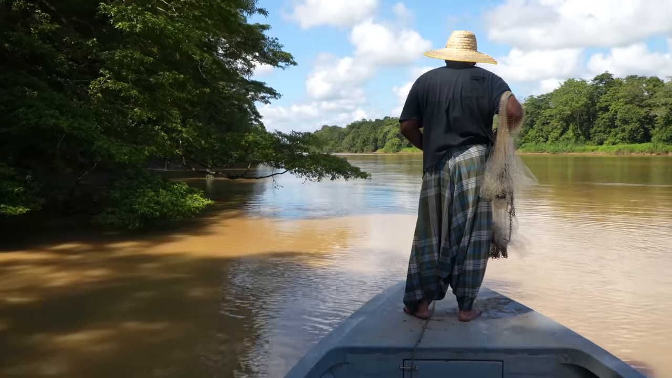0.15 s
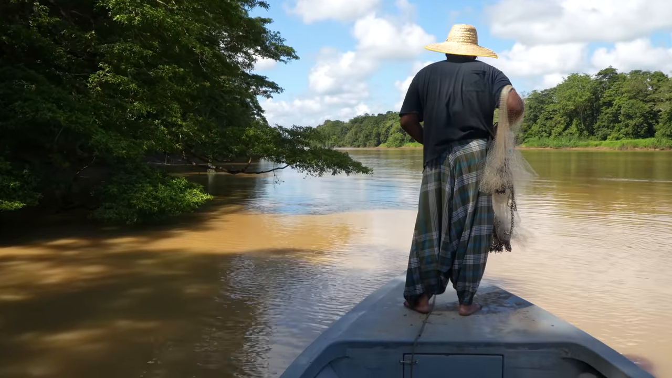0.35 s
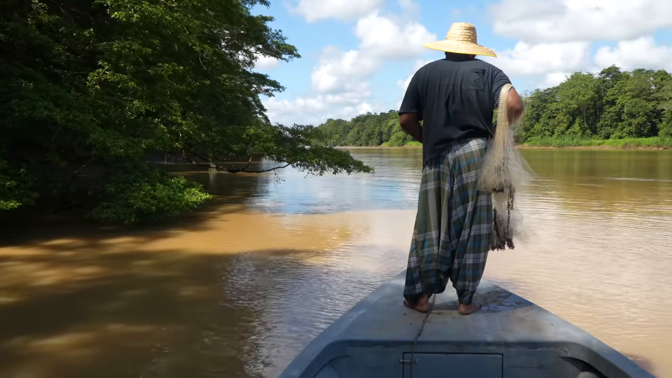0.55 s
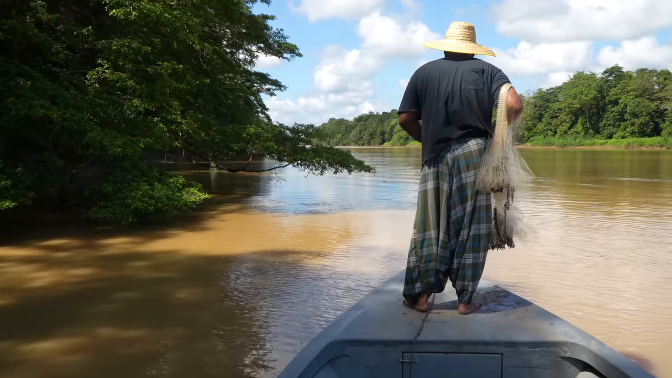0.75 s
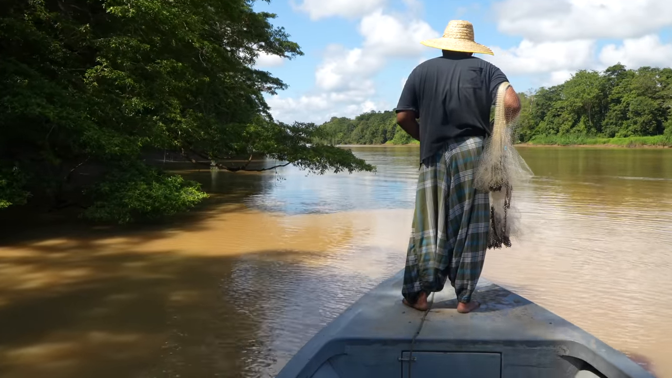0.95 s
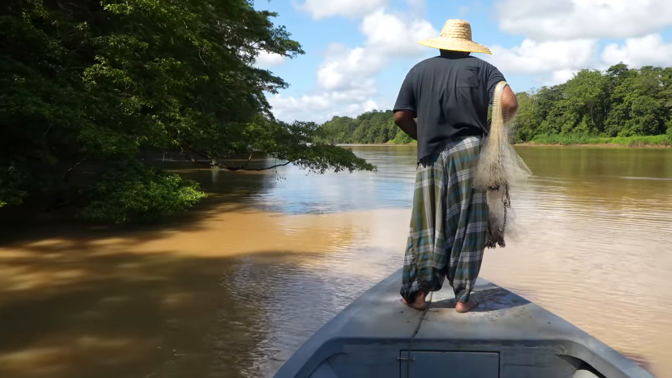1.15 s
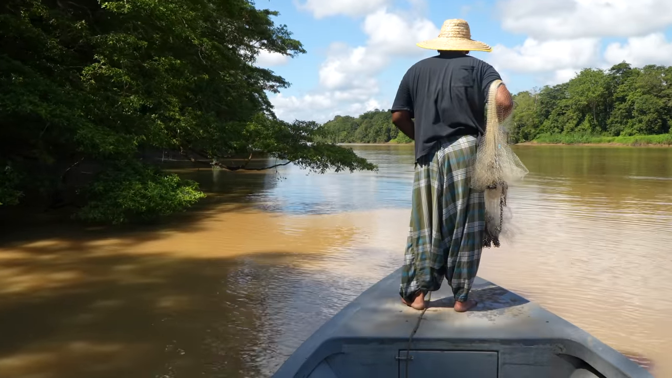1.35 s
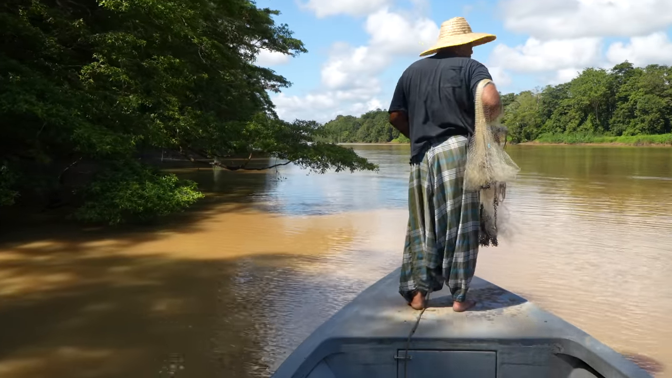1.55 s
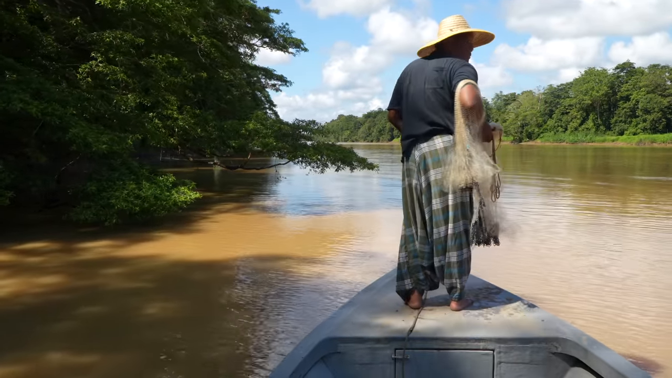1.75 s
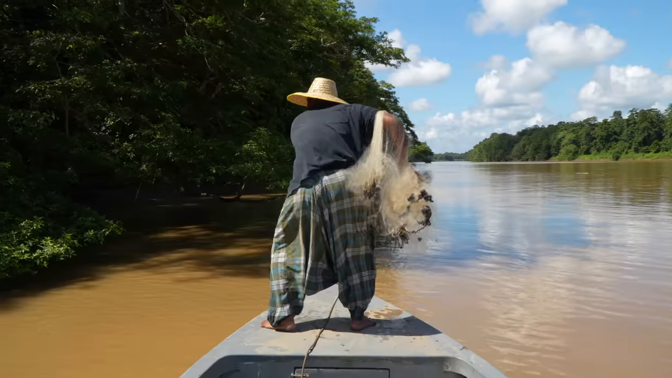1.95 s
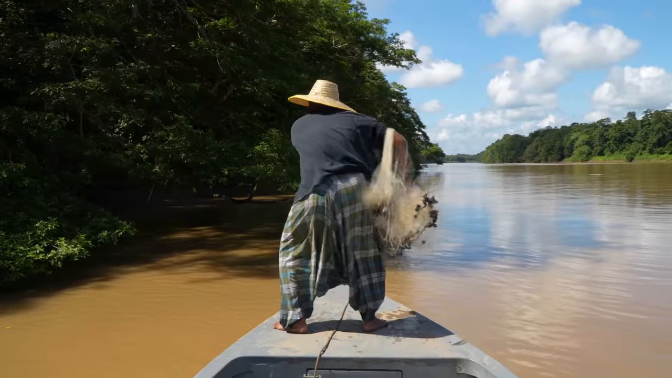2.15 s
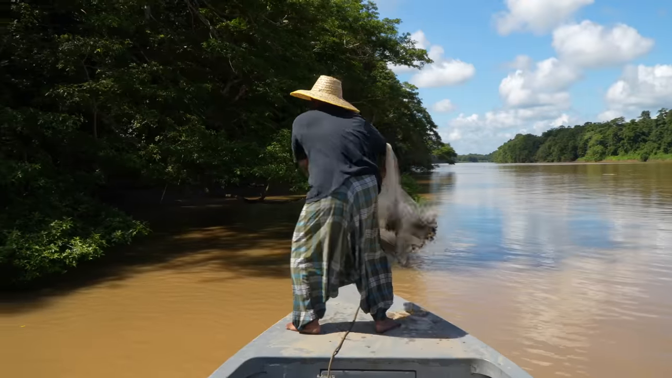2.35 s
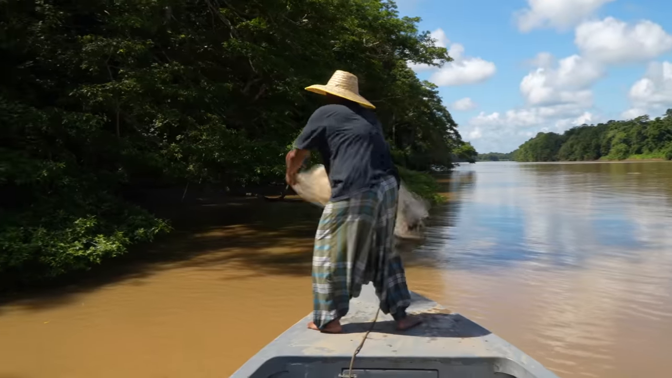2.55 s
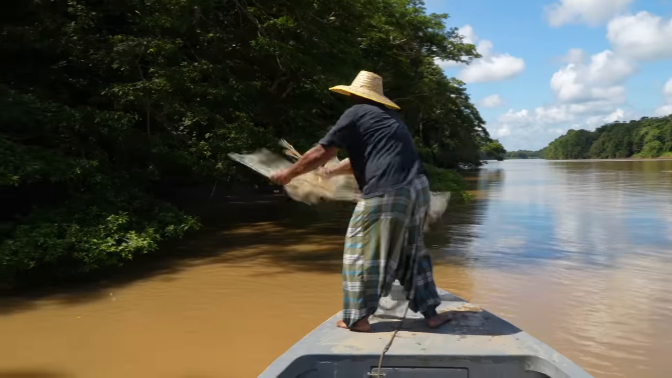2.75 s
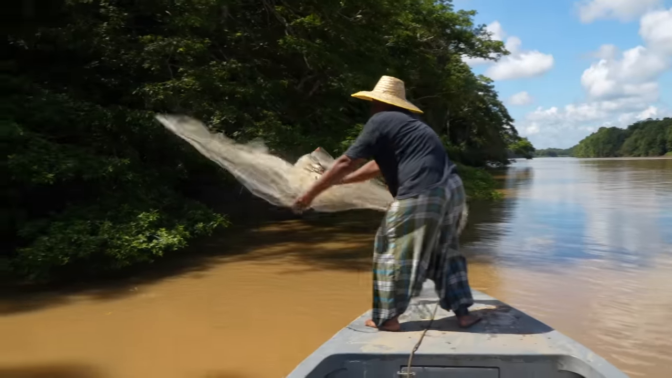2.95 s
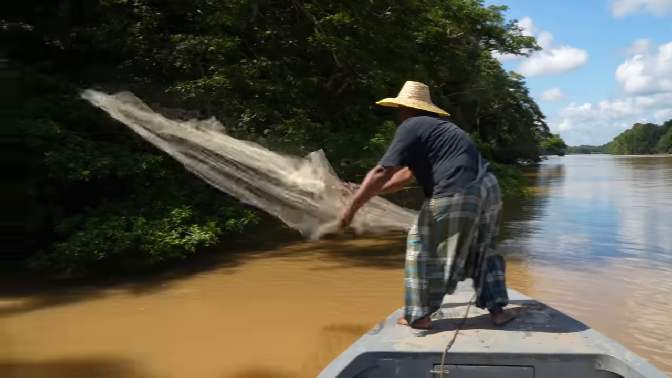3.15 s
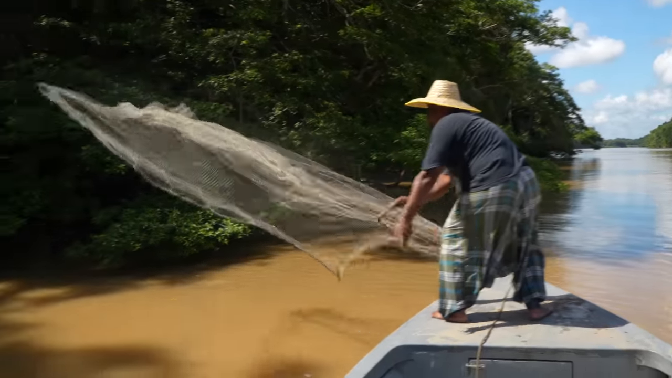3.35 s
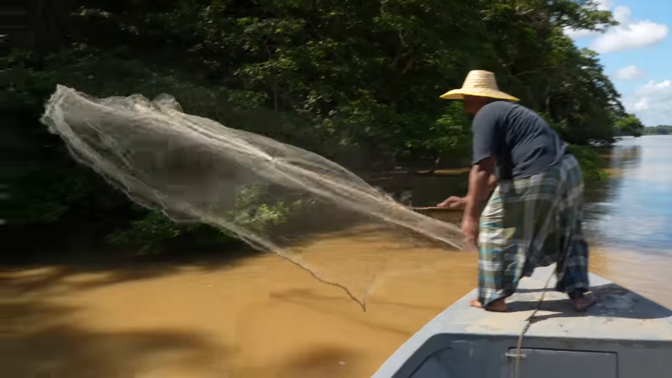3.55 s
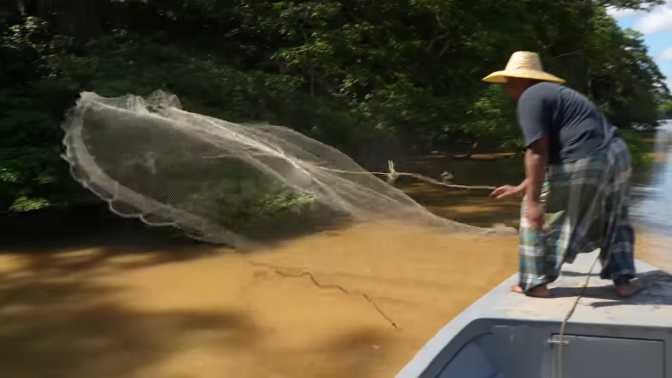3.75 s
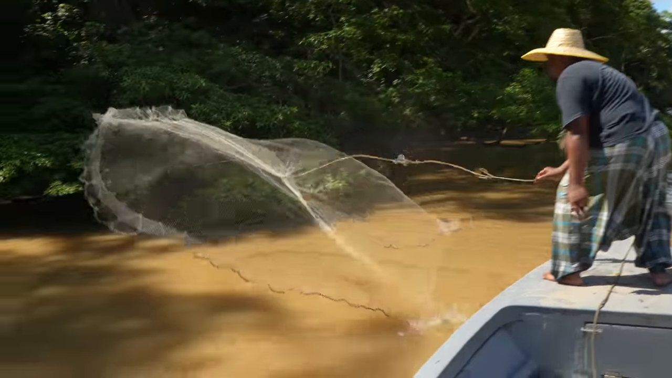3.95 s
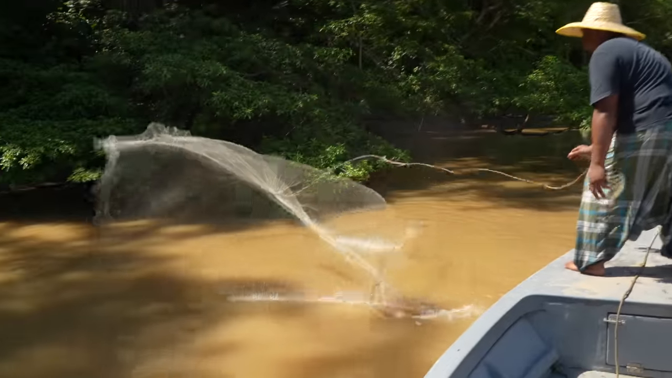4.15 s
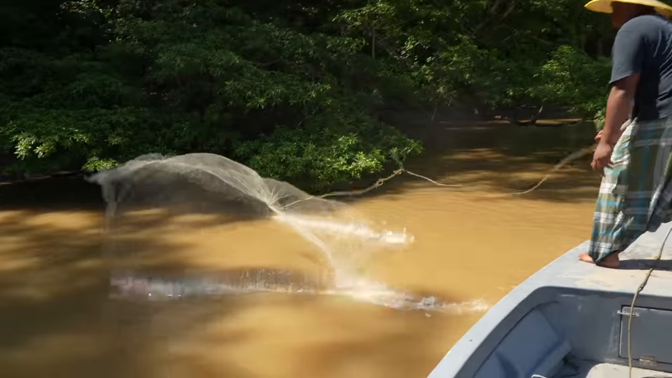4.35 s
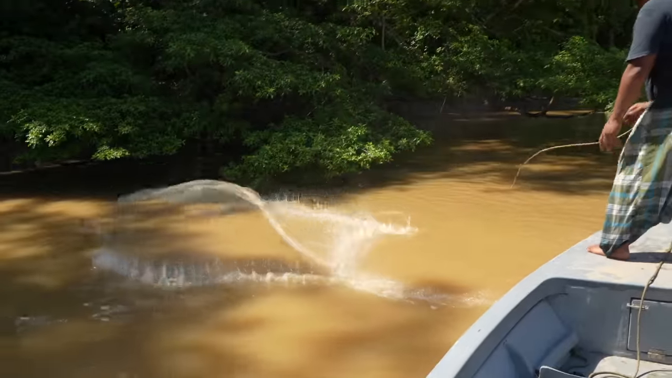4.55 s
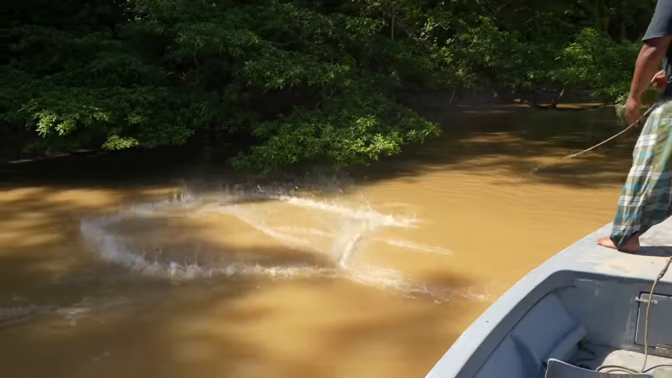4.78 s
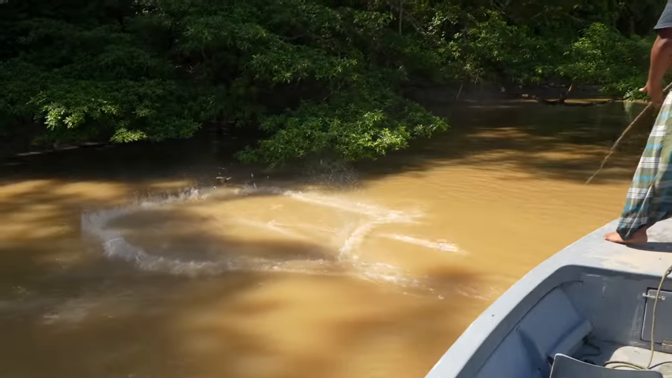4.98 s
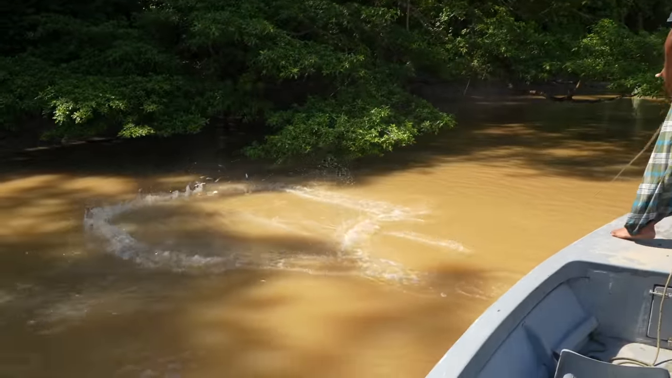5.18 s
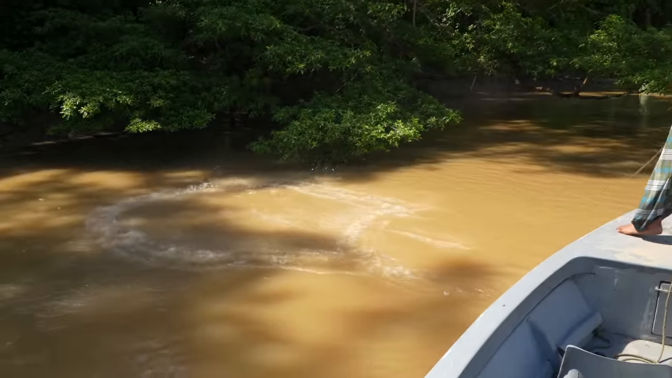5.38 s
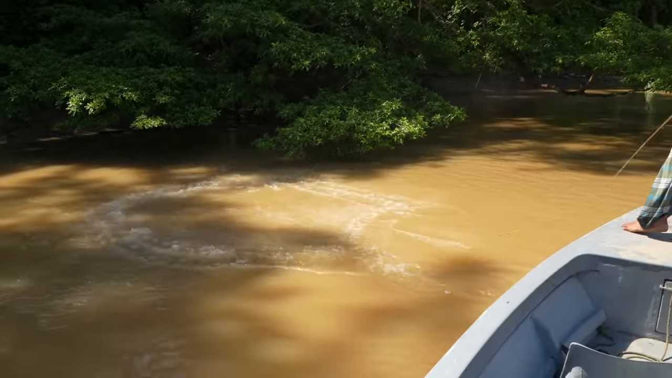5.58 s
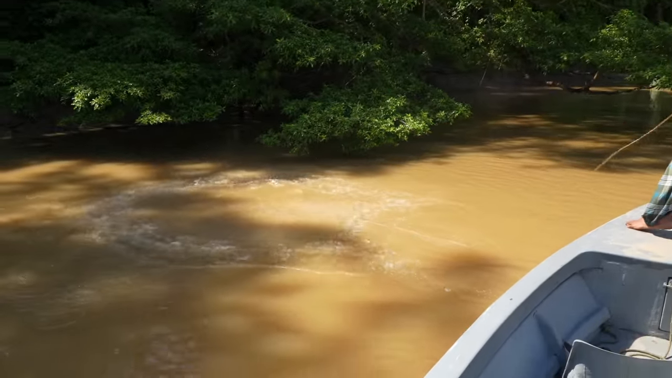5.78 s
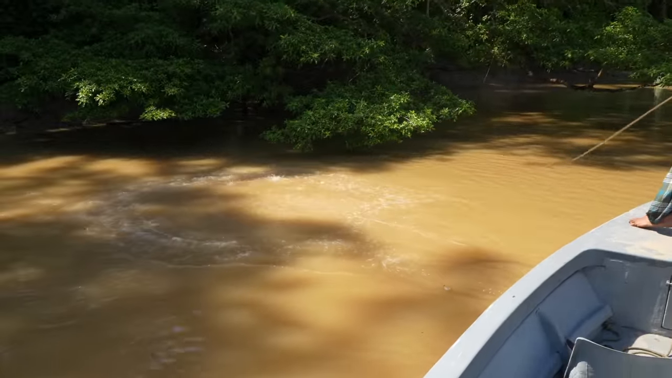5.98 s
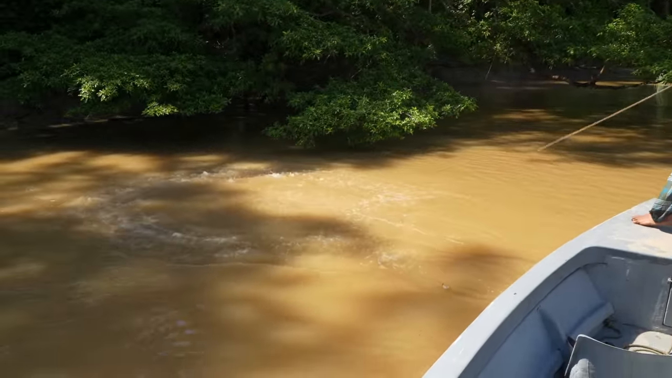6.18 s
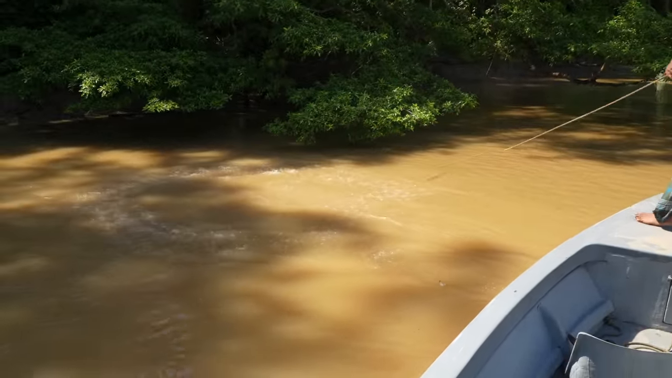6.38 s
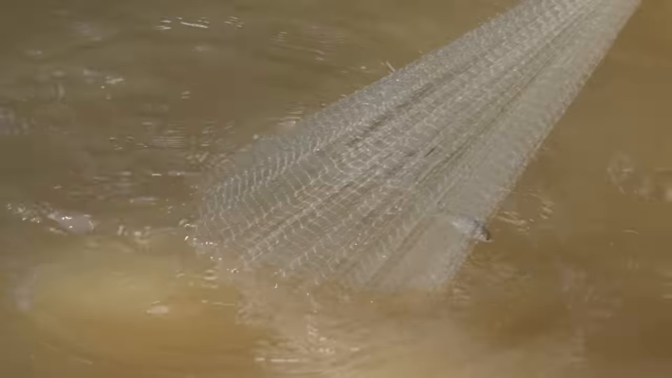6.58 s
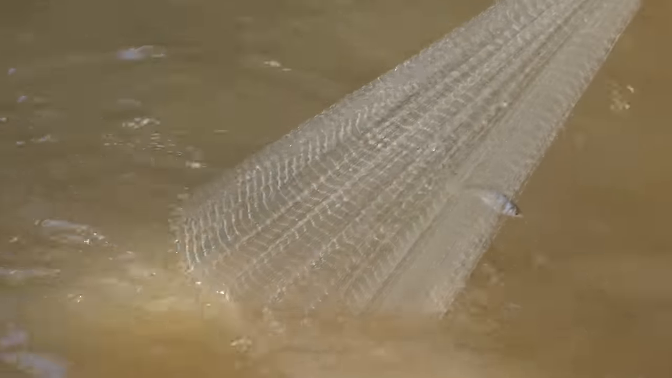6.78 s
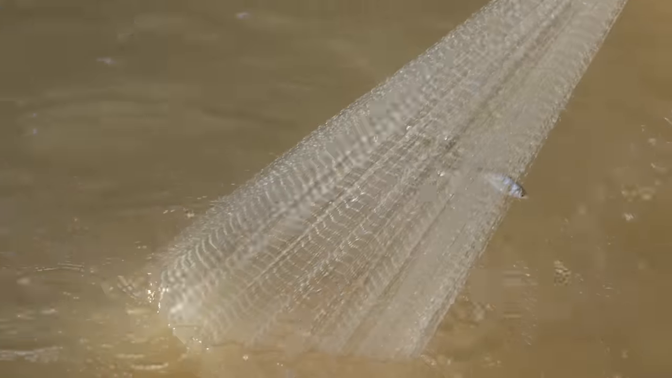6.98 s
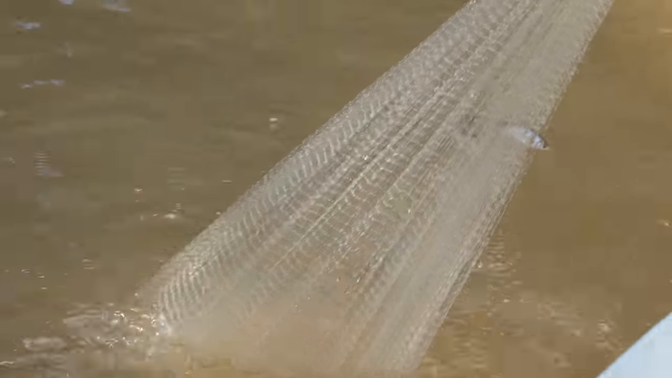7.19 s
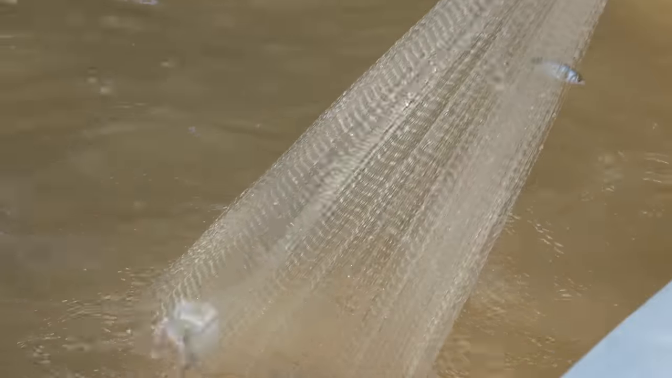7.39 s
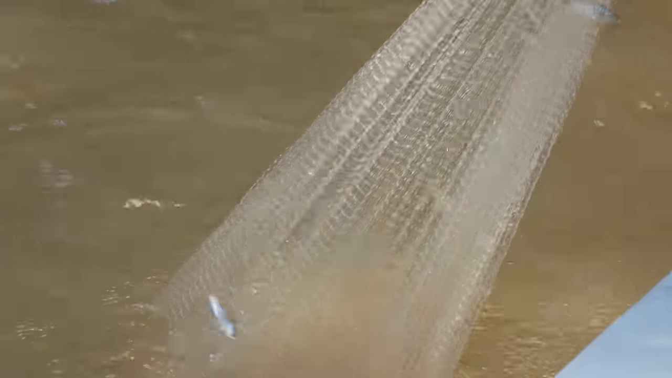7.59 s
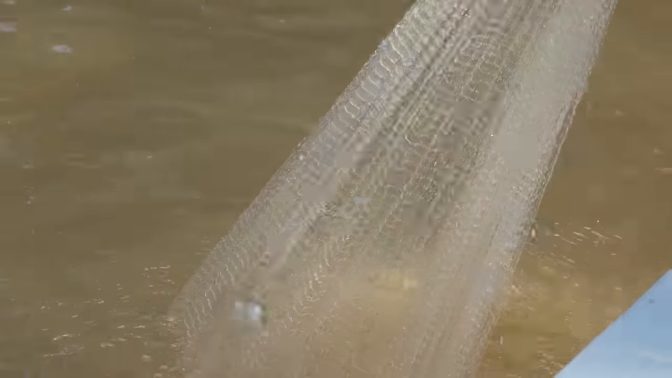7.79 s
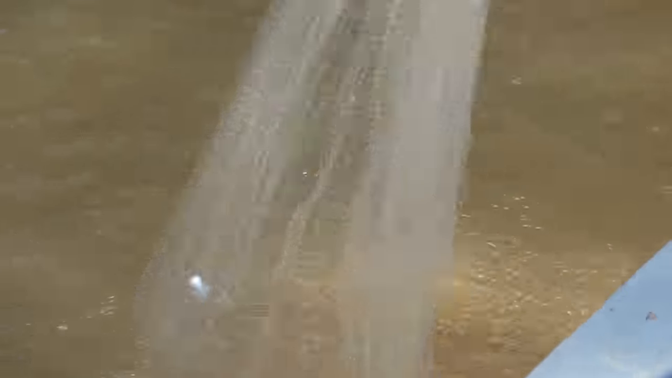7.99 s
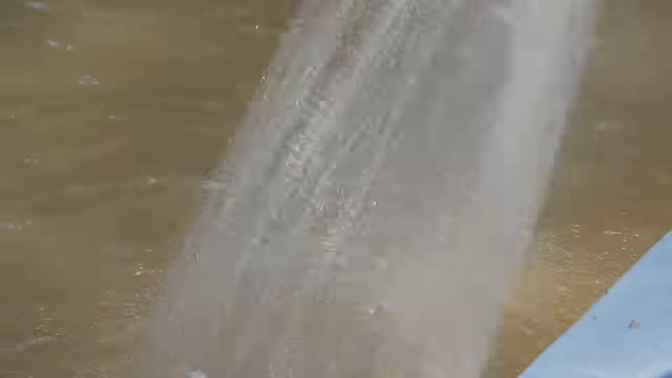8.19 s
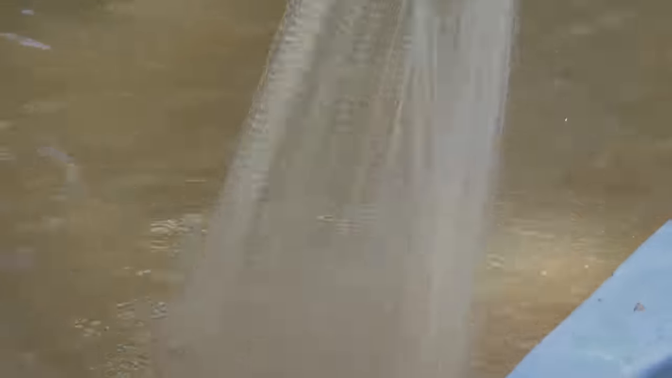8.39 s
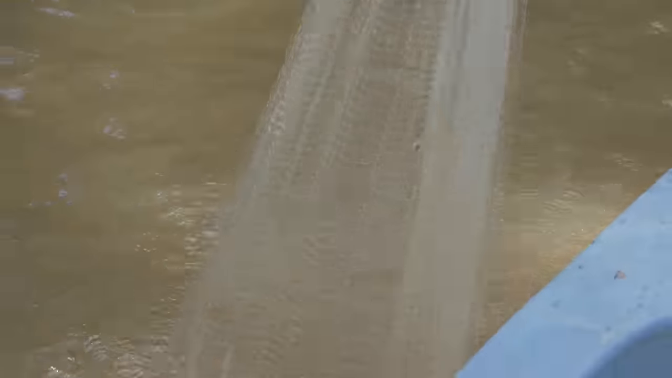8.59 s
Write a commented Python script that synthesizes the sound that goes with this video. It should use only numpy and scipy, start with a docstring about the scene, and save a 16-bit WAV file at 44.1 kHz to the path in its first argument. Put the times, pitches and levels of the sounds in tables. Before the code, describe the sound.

Insects hiss steadily as a boat motor stops, a foot thumps, a thrown net splashes down and its weights knock against the boat.

```python
"""A weighted net slaps and rains onto a forest river, cast from a small boat under a choir of insects.
First the outboard motor idles in noisy puffs and fades, a few far birds whistle and a foot thumps
the deck. After the splash come bubbles and drips, little pockets of air that ring in the water.
As the net is hauled in, its weights knock the hull and make it ring. A breeze rumbles underneath."""
import sys
import numpy as np
from scipy import signal
from scipy.fft import rfft, irfft
from scipy.io import wavfile
from scipy.ndimage import uniform_filter1d

SR = 44100
rng = np.random.default_rng(int(sys.argv[2]) if len(sys.argv) > 2 else 0)


def to_wav(s):
    """Save 16-bit WAV."""
    ch = np.atleast_2d(s).T  # columns
    pcm = np.round(np.clip(ch, -1, 1) * 32767)  # PCM
    wavfile.write(sys.argv[1], SR, pcm.astype(np.int16))


N = 380583
T = np.arange(N) / SR

# A colour says how strong each pitch is next to the others. t60 is the time to fade by 60 dB.
# colour of the insect choir: f/Hz, level/dB
INSECT_COLOUR = [(3240, -67), (5500, -37), (5960, -34), (6750, -8.5), (7130, -0.5), (7490, 3), (8260, -3.5),
                 (8910, -23.5), (10200, -34.5), (12300, -64), (12900, -38), (13300, -27), (14600, -17.5),
                 (15500, -19.5), (16000, -34)]
# colour of leaves and far water: f/Hz, level/dB
HUSH_COLOUR = [(15, -24), (25, 10.5), (81, -26), (104, -14), (204, -3.5), (392, -8), (538, -5.5),
               (1900, -38.5), (2990, -17), (3500, -11.5), (5500, -29), (7150, -88), (12100, -120)]
# breeze on the microphone: t/s, level/dB
BREEZE_LEVELS = [(0.0, -49), (0.8, -53.5), (1.55, -52), (1.87, -75), (2.5, -70), (2.95, -50.5), (3.3, -53),
                 (3.56, -58), (3.9, -55.5), (4.16, -66), (4.33, -56), (4.73, -60), (5.5, -61),
                 (6.39, -66.5), (6.7, -58), (7.59, -54), (8.07, -61), (8.63, -53.5)]
# colour of the breeze: f/Hz, level/dB
BREEZE_COLOUR = [(20, -2.5), (60, 3), (110, 0.5), (200, -10.5), (600, -39)]
# idling motor: t/s, level/dB
MOTOR_LEVELS = [(0.0, -37), (1.2, -36.5), (1.77, -44), (1.86, -64), (2.0, -82)]
# colour that exhaust and hull give the motor: f/Hz, level/dB
EXHAUST_COLOUR = [(15, -67), (25, -53), (97, -8.5), (150, -1.5), (242, 1), (366, -15.5), (410, -12.5),
                  (649, -17.5), (779, -15), (958, -16.5), (2950, -34), (3710, -31.5), (6000, -55),
                  (7800, -70), (13200, -120)]
# faint motor whines: f/Hz, width/Hz, level next to the puffs/dB
MOTOR_WHINES = [(429, 6, -15), (571.4, 27, -18.5), (788, 4.3, -18.5)]
# flow of water and wet mesh, in relative levels: t/s, churn/dB, large bubbles/dB, spray/dB
WATER_FLOW = [(1.9, -69.5, -81, -76), (2.8, -69.5, -76.5, -86.5), (3.45, -68, -62, -73),
              (3.76, -61.5, -73, -64), (3.87, -52, -57, -54), (4.1, -56.5, -67, -51),
              (4.15, -54.5, -58, -54), (4.23, -35, -40, -43), (4.38, -40.5, -51, -55),
              (4.49, -39.5, -45.5, -48.5), (4.531, -28, -61, -37.5), (4.61, -25, -26.5, -38.5),
              (4.73, -24.5, -26.5, -37), (4.78, -29.5, -28, -42), (4.92, -31.5, -39.5, -47),
              (5.24, -33, -37.5, -48), (5.4, -41.5, -46, -55.5), (5.6, -48.5, -50, -57.5),
              (5.79, -61.5, -75, -63), (6.75, -57.5, -77.5, -67.5), (7.33, -47.5, -57, -59),
              (7.7, -65.5, -67, -68.5), (8.63, -60, -54, -69)]
# gushes and dribbles on top: crest t/s, churn/dB, large bubbles/dB, spray/dB, fall time/s
WATER_GUSHES = [(2.96, -57.5, -57, -80, .06), (3.13, -58, -51, -83, .1), (3.223, -57.5, -42, -76, 0.034),
                (3.63, -58.5, -59, -64, 0.056), (3.788, -70, -34.5, -62, 0.013),
                (4.308, -50, -18, -52, 0.014), (4.402, -44, -54, -41, .01), (4.44, -49, -55, -59, .04),
                (4.834, -23.5, -27, -35.5, 0.033), (4.89, -28.5, -22, -48, 0.029),
                (5.209, -33.5, -38.5, -52, 0.083), (5.515, -51, -35, -60, 0.044),
                (5.825, -49, -79, -64, .08), (6.142, -47.5, -62, -57.5, 0.1),
                (6.265, -47.5, -75, -61, 0.073), (6.39, -81, -65, -76, 0.037),
                (6.637, -41, -88, -55.5, 0.037), (6.826, -43, -84, -66, 0.017),
                (6.913, -39, -72, -71, 0.03), (6.99, -52.5, -50, -70, 0.094), (7.2, -47, -69, -74, 0.039),
                (7.479, -51, -71, -66, 0.18), (8.212, -47.5, -69, -54, 0.054),
                (8.383, -56.5, -71, -56.5, 0.12), (8.455, -66, -49, -73, 0.036)]
# separate drops against smooth hiss: t/s, share of drops/0-1
DROP_SHARE = [(1.9, 0.3), (3.0, 0.36), (4.1, 0.2), (4.6, 0.44), (4.9, 0.49), (5.4, 0.67), (5.8, 0.6),
              (7.6, 0.93), (7.8, 0.15), (8.3, 0.27), (8.63, 0.46)]
# colour of churning water: f/Hz, level/dB
CHURN_COLOUR = [(71, -59), (120, -49), (272, -10), (316, -8.5), (442, -3), (617, -0.5), (833, 0), (1050, 1),
                (2160, -4.5), (3330, 3.5), (3680, -41), (4140, -16.5), (6500, -19), (8450, -49),
                (14300, -120)]
# colour of spray: f/Hz, level/dB
SPRAY_COLOUR = [(2240, -26.5), (3800, -8), (4290, -22), (6690, -14), (10300, -21.5), (12800, -21),
                (15100, -22.5), (16000, -34)]
# single large bubbles: t/s, length/s, first f/Hz, last f/Hz, level/dB, level change/dB
LARGE_BUBBLES = [(0.578, 0.069, 750, 760, -36, -28), (2.098, 0.032, 900, 3600, -60.5, 0),
                 (2.227, 0.054, 715, 655, -44.5, -28), (2.281, 0.007, 1820, 3700, -50, 1),
                 (2.986, 0.026, 1064, 1820, -49.5, 0.5), (3.278, 0.038, 783, 1610, -52, -5),
                 (5.285, 0.074, 299, 930, -54.5, 12), (5.51, 0.062, 284, 497, -38, -8),
                 (6.079, 0.014, 455, 455, -51, 0), (6.092, 0.037, 1015, 1150, -43.5, -11),
                 (6.317, 0.05, 360, 620, -58, 6), (6.362, 0.079, 1093, 1085, -57.5, -7),
                 (6.539, 0.039, 632, 730, -47, -16), (6.911, .052, 263, 1630, -53.5, 5),
                 (6.914, .045, 850, 902, -53, -1), (6.999, 0.078, 293, 1300, -37, -5),
                 (7.069, .02, 1396, 1600, -42, -2.5), (7.109, 0.021, 767, 2100, -26, -31),
                 (7.142, 0.03, 485, 756, -53, -13), (7.906, .06, 977, 950, -64, 7),
                 (8.113, 0.047, 550, 800, -50.5, -14), (8.426, 0.088, 587, 960, -51.5, -6),
                 (8.489, 0.027, 280, 300, -47, -13), (8.602, 0.029, 280, 280, -48, -13)]
# single drips: t/s, level/dB, f/Hz, tick above that level/dB
WATER_DRIPS = [(1.555, -41, 3000, 10), (1.904, -45.5, 616, -8), (1.951, -44, 650, -10),
               (2.109, -42.5, 2230, -5), (2.125, -44, 2970, -3), (2.206, -38.5, 2320, -3),
               (2.279, -45, 850, 6), (3.187, -42, 2600, 3), (3.232, -38.5, 890, -1), (3.272, -39, 765, -7),
               (4.399, -37, 3600, -4), (5.337, -21, 3180, -12), (5.344, -20, 3050, -20),
               (5.396, -26, 3400, 4), (5.421, -22.5, 2820, -2), (5.473, -23.5, 3630, 2),
               (5.544, -25, 830, -1), (5.637, -38, 750, -7), (5.67, -36, 3480, -5), (5.74, -34, 1420, -6),
               (5.813, -30, 2000, -2), (5.822, -29.5, 3150, -12), (5.851, -36, 1410, -7),
               (5.862, -28, 3030, -9), (5.944, -37, 2310, -6), (6.039, -39, 1360, -4),
               (6.053, -34, 3020, 0), (6.082, -42, 1010, 9), (6.119, -30, 748, -2), (6.143, -25, 3500, -8),
               (6.255, -26, 1600, 2), (6.303, -34, 820, -10), (6.342, -40, 1480, 7),
               (6.404, -28.5, 2200, -3), (6.44, -35.5, 694, -13), (6.473, -38, 2970, -1),
               (6.613, -30.5, 2620, -5), (6.62, -30.5, 1250, -5), (6.642, -26.5, 2420, 4),
               (6.824, -30.5, 2770, -5), (6.895, -33.5, 496, 1), (6.916, -32.5, 1510, 0),
               (6.952, -29, 1950, -10), (6.998, -38, 520, -3), (7.132, -24, 1730, -8),
               (7.157, -30, 3380, -13), (7.192, -32, 3420, -5), (7.205, -34, 790, -3),
               (7.237, -38, 3260, -5), (7.269, -33, 1310, -1), (7.366, -24, 940, -2),
               (7.461, -29.5, 1520, -1), (7.704, -34.5, 1060, -4), (7.958, -43.5, 820, -12),
               (8.182, -38, 3120, -5), (8.206, -30.5, 2860, -7), (8.211, -30, 3320, 2),
               (8.225, -34, 1040, -4), (8.24, -31, 990, 7.5), (8.319, -40.5, 690, 6),
               (8.413, -41, 1170, -5), (8.43, -28.5, 2610, -12)]
# colour of the tick that starts a drip or a crack: f/Hz, level/dB
TICK_COLOUR = [(200, -35), (1200, 2.5), (3400, 5), (4300, -12), (7000, -8.5), (14000, -31)]
# far birds: t/s, length/s, f/Hz, level/dB
BIRD_NOTES = [(1.745, 0.22, 3100, -78), (2.222, .05, 3540, -59), (2.32, .04, 4500, -68),
              (2.356, 0.07, 3590, -59), (2.358, 0.033, 2880, -64), (2.455, .05, 3400, -64),
              (2.772, 0.035, 3560, -67), (2.862, 0.031, 3550, -57)]
# foot on the deck: t/s, level/dB, first f/Hz, settled f/Hz, t60/s
FOOT_THUMPS = [(2.881, -2.3, 70, 46, .22)]
# booms after the feet, the slap and the weights: t/s, level/dB, centre f/Hz, rise/s, t60/s
DULL_BOOMS = [(2.887, -18, 143, .006, 0.076), (2.961, -38.5, 59.5, 0.011, 0.5),
              (3.209, -35, 78, 0.014, 0.26), (4.19, -22, 88, 0.034, 0.4), (7.51, -36, 200, .008, .2),
              (7.588, -30.5, 233, .008, 0.32)]
# cracks of the deck under the foot: t/s, level/dB
DECK_CRACKS = [(2.889, -21), (2.914, -27)]
# the net's weighted edge hits the water: t/s, level/dB
NET_SLAPS = [(4.166, -6), (4.177, -2), (4.19, -0.5), (4.22, -16.5), (4.261, -15), (4.305, -24)]
# colour of a slap: f/Hz, level/dB
SLAP_COLOUR = [(24, -66), (40, -30), (269, -1.5), (402, -7), (715, 8.5), (852, -3), (1270, 5), (1850, -8.5),
               (2840, -6.5), (3380, 5), (4340, -10.5), (9690, -13), (16000, -26)]
# how long each pitch lasts in a slap: f/Hz, t60/s
SLAP_FADE = [(60, 0.67), (250, 0.42), (800, 0.15), (3300, 0.14), (6000, 0.058), (14000, 0.068)]
# weights on the hull: t/s, level/dB, hardness/dB per octave, rattle/dB, rise/s,
# ring time/factor, pitch/factor, roughness/0-1
WEIGHT_KNOCKS = [(7.288, -3.5, 3, 2, 0.015, 1, 1.005, 0.06),
                 (7.512, -19.5, -0.5, -24, 0.0018, 0.46, 0.89, 0.78),
                 (7.589, -20.5, 1, -2.5, 0.0013, 0.62, 1.23, 1)]
# the hull's own ringing tones: f/Hz, level/dB, t60/s
HULL_TONES = [(151, -33, 0.22), (208, 2.9, 0.26), (275.5, -9, 0.25), (474, -12.5, 0.29), (612, -16.5, 0.21),
              (703, -17, 0.22), (810, -4, 0.17), (968, -5.5, 0.13), (1180, -1, 0.055), (1253, -17, 0.1),
              (1330, -14, 0.12), (1620, -17, 0.081), (1980, -42, 0.09)]
# colour of the rattling weights: f/Hz, level/dB
RATTLE_COLOUR = [(60, -50), (200, -2), (900, 7), (3400, -0.5), (5000, -8), (12000, -36)]


def amp(db):
    """Turns decibels into a factor to multiply by."""
    return 10 ** (np.asarray(db) / 20)


def evened(x):
    """Scales a signal to an average power of 1."""
    return x / np.sqrt(np.mean(x ** 2) + 1e-20)


def over_time(points):
    """Joins (time, value) points with straight lines."""
    return np.interp(T, *np.transpose(points))


def at_pitch(points, hz):
    """Looks up a value between (pitch, value) points, with octaves evenly spaced."""
    f, value = np.transpose(points)
    return np.interp(np.log(hz + 1), np.log(f + 1), value)


def add(mix, s, sound):
    """Mixes a sound in at s seconds."""
    part = mix[round(s * SR):][:len(sound)]
    part += sound[:len(part)]


def colour(x, points):
    """Gives a sound a colour and a power of 1. Nothing rings early, so clicks keep a sharp front."""
    hz = abs(np.fft.fftfreq(8192, 1 / SR))
    log_gain = np.log(amp(np.maximum(at_pitch(points, hz), -100)))
    phase = -signal.hilbert(log_gain).imag
    response = np.fft.ifft(np.exp(log_gain + 1j * phase)).real[:4096]
    return evened(signal.oaconvolve(x, response)[:len(x)])


def whistle(hz, width_hz):
    """Noise squeezed around one pitch: a fuzzy whistle."""
    memory = np.exp(-np.pi * width_hz / SR)
    slow = signal.lfilter([1], [1, -memory], rng.standard_normal(N) + 1j * rng.standard_normal(N))
    return evened((slow * np.exp(2j * np.pi * hz * T)).real)


def wander(per_s):
    """A random wobble; a larger per_s makes it quicker."""
    steps = rng.standard_normal(int(T[-1] * 400) + 9)
    smooth = signal.lfilter([1], [1, -np.exp(-per_s / 400)], steps)
    return evened(np.interp(T * 400, np.arange(len(steps)), smooth))


def patter(per_s, spread_db, share):
    """Random drops, most small and a few large, blended with smooth hiss."""
    draw = rng.random(N) * SR / per_s
    hit, clicks = draw < 1, np.zeros(N)
    clicks[hit] = amp(spread_db * np.minimum(-np.log(draw[hit] + 1e-9), 4))
    clicks /= np.sqrt(per_s / SR) * amp(1.6 * spread_db)  # about as strong as the hiss
    return np.sqrt(share) * clicks + np.sqrt(1 - share) * rng.standard_normal(N)


def forest(insect_db=-46.5, hush_db=-64):
    """Many insects merge into a high, slightly trembling hiss, over the hush of leaves and far water."""
    insects = amp(insect_db + 0.57 * wander(per_s=270)) * colour(rng.standard_normal(N), INSECT_COLOUR)
    return insects + amp(hush_db) * colour(rng.standard_normal(N), HUSH_COLOUR)


def breeze():
    """Air blowing on the microphone makes a lumpy, low rumble."""
    rumble = colour(rng.standard_normal(N), BREEZE_COLOUR)
    return amp(over_time(BREEZE_LEVELS) + 2 * wander(per_s=10)) * rumble


def motor(firings_per_s=28):
    """Each uneven firing sends a puff of noise through the exhaust."""
    firings = np.cumsum(firings_per_s * (1 + 0.16 * wander(per_s=57))) / SR
    strength = amp(3 * rng.standard_normal(400)[firings.astype(int) % 400])
    puffs = (1.7 + strength * np.exp(-(firings % 1) / 0.85)) * rng.standard_normal(N)
    whines = sum(amp(db) * whistle(hz, width) for hz, width, db in MOTOR_WHINES)
    level_db = np.interp(T, *np.transpose(MOTOR_LEVELS), right=-120)
    return amp(level_db) * (colour(puffs, EXHAUST_COLOUR) + whines)


def water_levels(rise_share=0.82):
    """Adds the power of flow and gushes, giving churn, large-bubble and spray levels in dB."""
    s, *columns = np.transpose(WATER_FLOW)
    power = np.array([amp(np.interp(T, s, column)) ** 2 for column in columns])
    for crest, churn_db, deep_db, spray_db, fall in WATER_GUSHES:
        near = slice(round((crest - .25) * SR), round((crest + .5) * SR))
        away = (T[near] - crest) / fall
        shape_db = -10 * np.where(away > 0, away, -away / rise_share)  # rises faster than it falls
        power[:, near] += amp(np.array([[churn_db], [deep_db], [spray_db]]) + shape_db) ** 2
    return 10 * np.log10(power)


def water():
    """A swarm of rising bubbles under fizzing spray; the large, low ones come and go by themselves."""
    churn_db, deep_db, spray_db = water_levels()
    drops = over_time(DROP_SHARE)
    busy = np.clip(amp(.7 * (churn_db + 28.5)), .1, 1)  # calm water has few bubbles
    swarm = np.zeros(N)
    for hz in np.geomspace(150, 5500, num=26):
        cycles = hz * T[:int(14 * SR / hz)]
        envelope = np.exp(-cycles / 1.88) * (1 - np.exp(-cycles / 5.5))
        blip = envelope * np.sin(2 * np.pi * cycles * (1 + 0.018 * cycles))
        large = np.clip(np.log2(1300 / hz) / 2.2, 0, 1)  # 1 for large bubbles, 0 for small
        level_db = churn_db + large * (deep_db + 7 - churn_db)
        kicks = amp(level_db) * patter(busy * hz / 12, spread_db=2.5, share=drops)
        bubbling = signal.oaconvolve(kicks, blip / np.linalg.norm(blip))[:N]
        swarm += amp(at_pitch(CHURN_COLOUR, hz)) * np.sqrt(hz / 1000) * bubbling
    swarm = signal.sosfilt(signal.butter(4, 170, "high", fs=SR, output="sos"), swarm)  # no deep bass
    clumps = amp((1.67 - 0.6 * busy) * wander(per_s=410))  # drops land in clumps
    fizz = colour(patter(busy * 1000, spread_db=4.3, share=drops / 2), SPRAY_COLOUR)
    return clumps * (amp(-9.5) * swarm + amp(spray_db + 5) * fizz)


def bubbles(onset_s=0.00095):
    """Each large bubble sings one tone; most climb in pitch as they near the surface."""
    out = np.zeros(N)
    for s, length, first_hz, last_hz, level_db, change_db in LARGE_BUBBLES:
        done = np.linspace(0, 1, int(length * SR))
        hz = first_hz * (last_hz / first_hz) ** (done ** 2.7)  # most of the glide comes late
        fades = np.minimum(done * length / onset_s, 1) * np.minimum(10 - 10 * done, 1)
        tone = np.sqrt(2) * np.sin(2 * np.pi * np.cumsum(hz) / SR)
        add(out, s, amp(level_db + change_db * done) * fades * tone)
    return out


def taps(rows):
    """Each small impact makes a tick, then a short ring that rises by a random amount."""
    out, t = np.zeros(N), T[:3000]
    impacts = rng.standard_normal((len(rows), len(t))) * np.exp(-t / .001)
    ticks = colour(impacts.ravel(), TICK_COLOUR).reshape(impacts.shape)
    for (s, level_db, hz, t60, tick_db), tick, rise in zip(rows, ticks, rng.random(len(rows))):
        envelope = amp(-60 * t / t60) * (1 - np.exp(-t / 0.00015))
        ring = envelope * np.sin(2 * np.pi * hz * t * (1 + 9.2 * rise * t))
        add(out, s, amp(level_db) * (0.9 * ring + amp(tick_db) * tick / abs(tick).max()))
    return out


def drips(t60_at_1khz=0.031):
    """Each drop rings a pocket of air; small, high ones die sooner."""
    return taps([(s, db, hz, t60_at_1khz * (hz / 1000) ** -0.42, tick_db)
                 for s, db, hz, tick_db in WATER_DRIPS])


def birds():
    """Far birds whistle faint, steady notes from the trees."""
    out = np.zeros(N)
    for s, length, hz, level_db in BIRD_NOTES:
        fades = signal.windows.tukey(int(length * SR), .5)
        add(out, s, amp(level_db) * fades * whistle(hz, width_hz=110)[:len(fades)])
    return out


def foot_thump():
    """A foot sets the deck swinging; the low pitch sinks as the large first swing relaxes."""
    out, t = np.zeros(N), T[:SR // 2]
    for s, level_db, first_hz, settled_hz, t60 in FOOT_THUMPS:
        hz = settled_hz + (first_hz - settled_hz) / (1 + (t / .022) ** 8)
        heel = np.exp(-((t - .0145) / .0075) ** 2)  # the weight comes down
        ring = amp(-60 * t / t60) * np.sin(np.pi / 2 * np.minimum(t / .02, 1)) ** 2
        phase = 2 * np.pi * np.cumsum(hz) / SR
        swing = (.8 * heel + .9 * ring) * np.sin(phase)
        overtone = -0.12 * ring * np.cos(2 * phase)  # sharp crests, flat troughs
        add(out, s, amp(level_db) * (swing + overtone))
    return out


def booms(spread_octaves=0.7):
    """After a blow, low noise swells and dies with no clear ring."""
    out, t = np.zeros(N), T[:SR // 2]
    hz = np.fft.rfftfreq(len(t), 1 / SR) + 1
    for s, level_db, centre_hz, rise, t60 in DULL_BOOMS:
        band = np.exp(-.5 * (np.log2(hz / centre_hz) / spread_octaves) ** 2)
        rumble = evened(irfft(band * rfft(rng.standard_normal(len(t))), len(t)))
        swell = 1 - np.exp(-(t / rise) ** 2)
        add(out, s, amp(level_db - 60 * t / t60) * swell * rumble)
    return out


def deck_cracks(hz=486, t60=0.0042, tick_db=-1.5):
    """The deck gives two short, dry cracks under the foot."""
    return taps([(s, db, hz, t60, tick_db) for s, db in DECK_CRACKS])


def net_slaps(rise_s=0.004):
    """The net's weighted edge hits the water in bursts of noise whose treble dies first."""
    out = np.zeros(N)
    for s, level_db in NET_SLAPS:
        noise = colour(rng.standard_normal(SR // 2), SLAP_COLOUR)
        hz, t, spectrum = signal.stft(noise, SR, nperseg=256, noverlap=192)
        fade = amp(-60 * t / at_pitch(SLAP_FADE, hz)[:, None])
        _, burst = signal.istft(spectrum * fade, SR, nperseg=256, noverlap=192)
        onset = np.minimum(T[:len(burst)] / rise_s, 1)
        add(out, s, amp(level_db) * onset * burst / abs(burst).max())
    return out


def hull_knocks():
    """Several weights land almost together: they ring the hull and leave a short rattle."""
    out, t = np.zeros(N), T[:SR // 2]
    for s, level_db, hardness_db, rattle_db, rise, ring, pitch, rough in WEIGHT_KNOCKS:
        chance = rng.standard_normal((len(HULL_TONES), len(t)))
        wobbles = evened(uniform_filter1d(uniform_filter1d(chance, size=500), size=500))
        phases = 2 * np.pi * rng.random(len(HULL_TONES))
        tones = np.zeros(len(t))
        for (hz, db, t60), wobble, phase in zip(HULL_TONES, wobbles, phases):
            crowding = min(rough + hz / 1800, 1)  # high tones have close neighbours, so they waver
            waver = 1 + 2.15 * crowding * wobble
            fade = amp(db + hardness_db * np.log2(hz / 500) - 60 * t / (ring * t60))
            swell = 1 - np.exp(-hz * t / 3.5)  # low tones swell more slowly
            tones += fade * waver * swell * np.sin(2 * np.pi * pitch * hz * t + phase)
        rattle = colour(rng.standard_normal(len(t)), RATTLE_COLOUR)
        rattle *= np.exp(-t / 0.0087) + 0.022 * np.exp(-t / 0.17)
        landing = np.minimum(t / rise, 1)
        add(out, s, amp(level_db) * landing * (0.46 * tones + amp(rattle_db) * rattle))
    return out


def scene():
    """Adds river, boat and forest together in one channel."""
    river = water() + net_slaps() + bubbles() + drips()
    boat = motor() + foot_thump() + deck_cracks() + hull_knocks() + booms()
    return (forest() + birds() + breeze() + river + boat)[None]


def record(dry):
    """Rounds off loud peaks, then cuts the highest treble."""
    ceiling, top_hz = 0.86, 15800
    rounded = dry / (1 + (dry / ceiling) ** 6) ** (1 / 6)
    treble_cut = signal.firwin(511, top_hz, window=("kaiser", 9), fs=SR)
    return signal.oaconvolve(rounded, treble_cut[None], "same")


dry = scene()
out = record(dry)
to_wav(out)
```